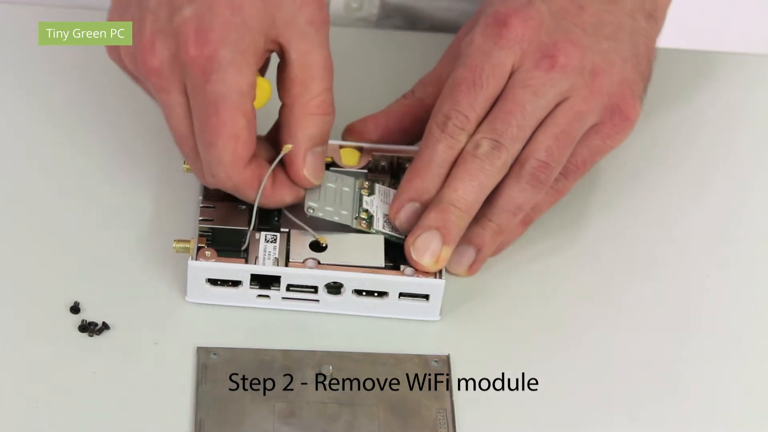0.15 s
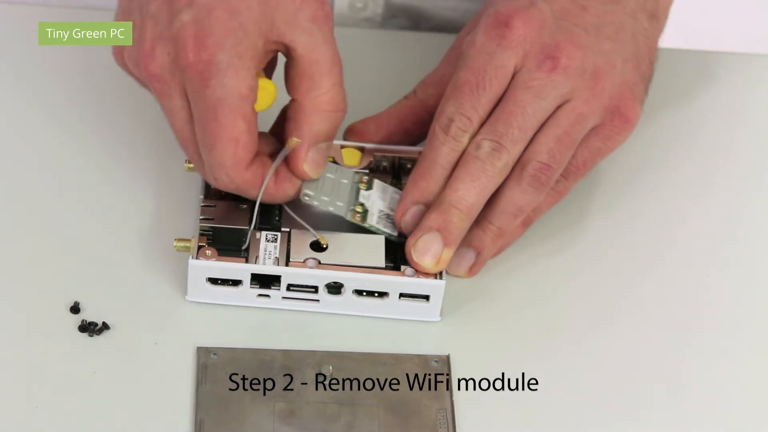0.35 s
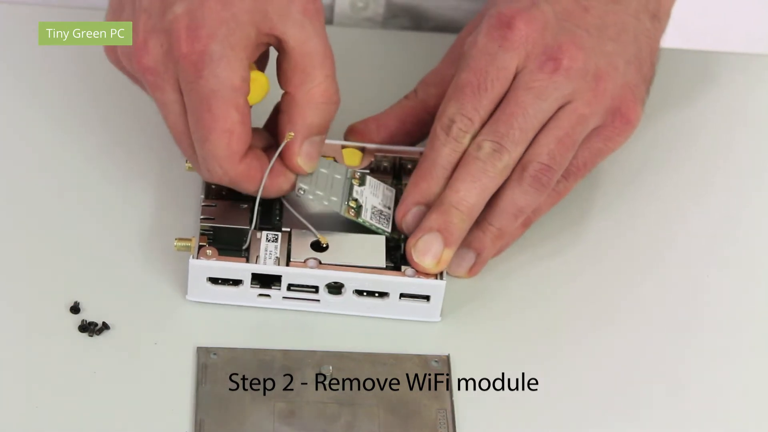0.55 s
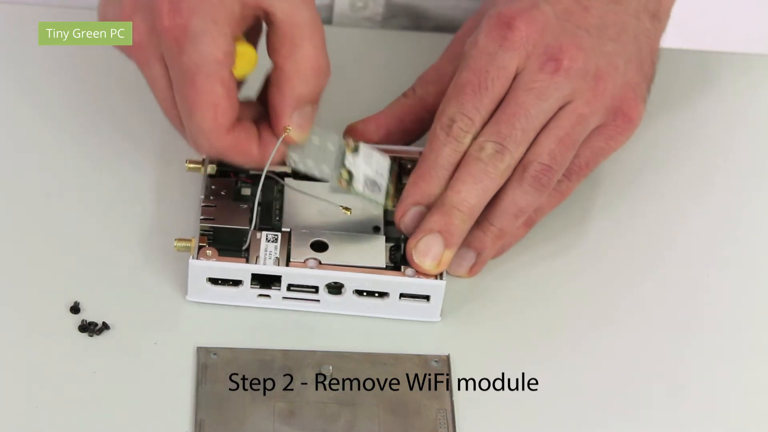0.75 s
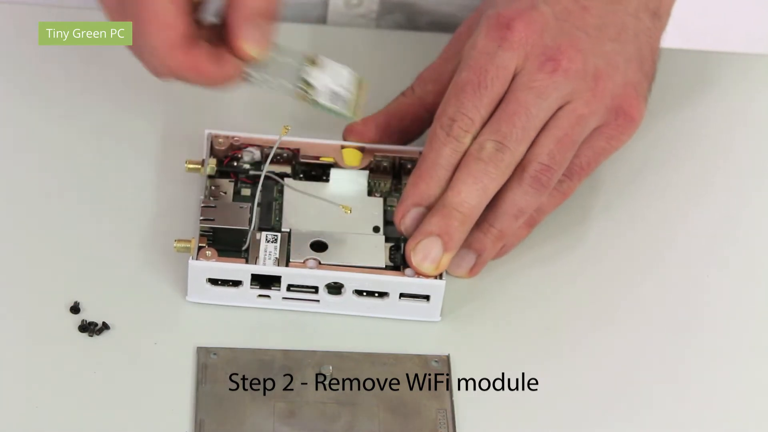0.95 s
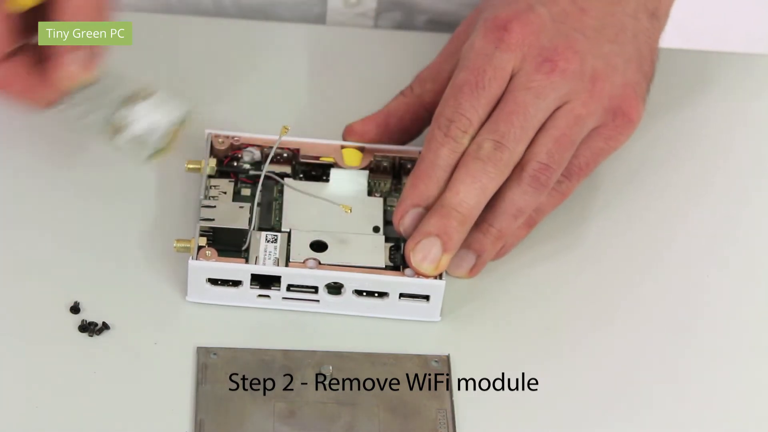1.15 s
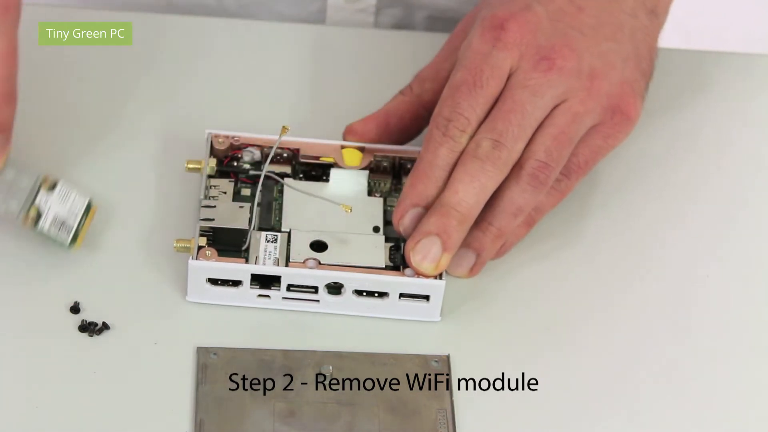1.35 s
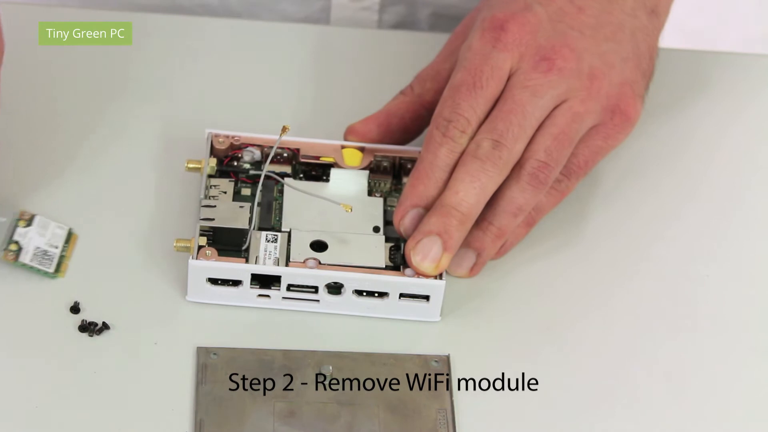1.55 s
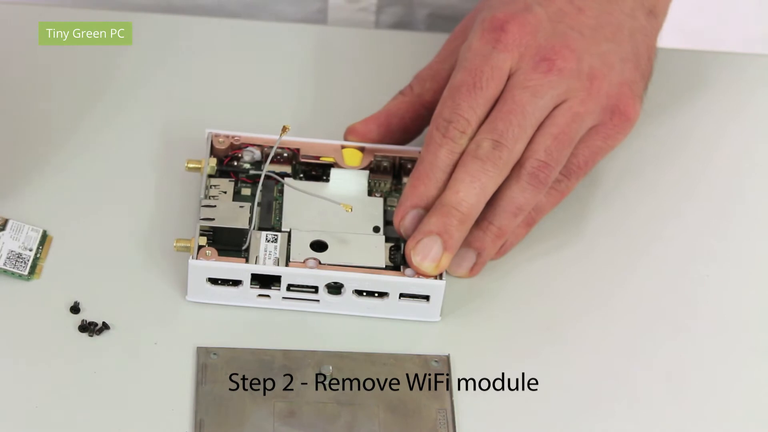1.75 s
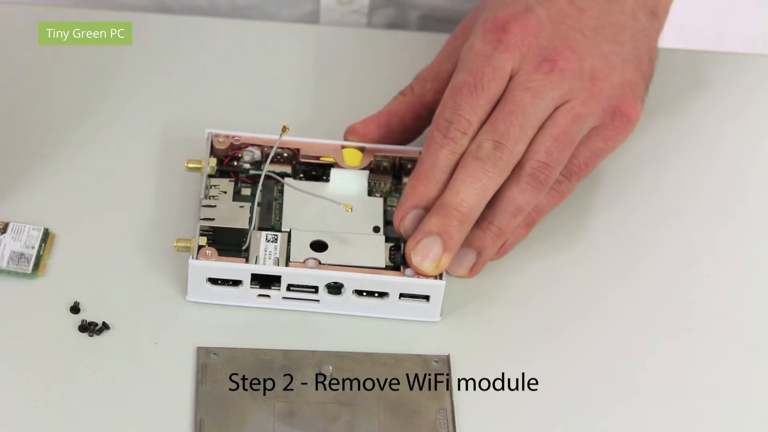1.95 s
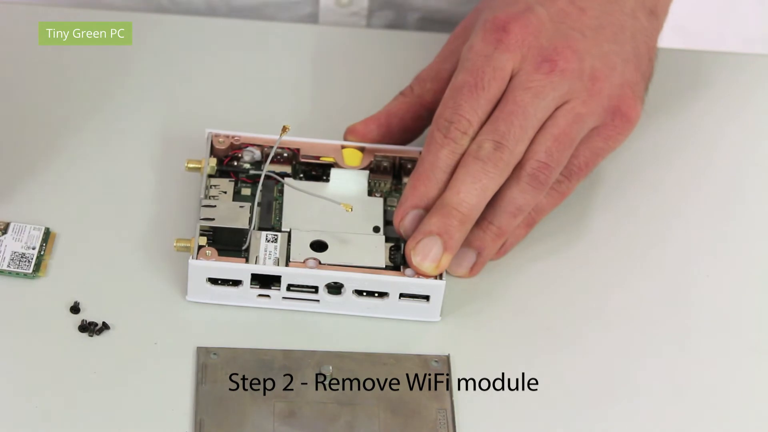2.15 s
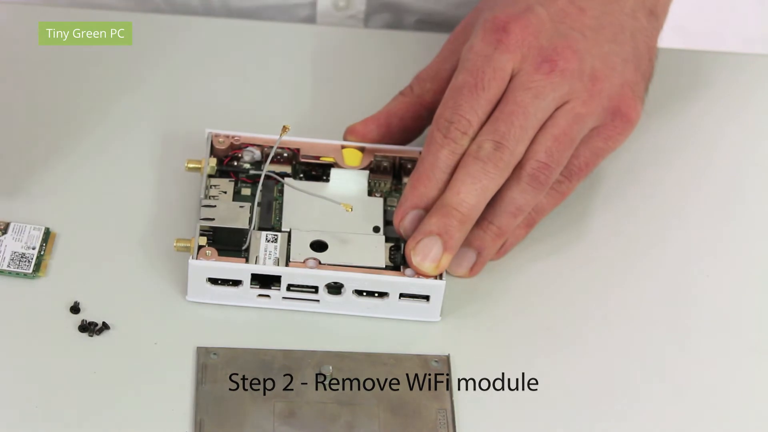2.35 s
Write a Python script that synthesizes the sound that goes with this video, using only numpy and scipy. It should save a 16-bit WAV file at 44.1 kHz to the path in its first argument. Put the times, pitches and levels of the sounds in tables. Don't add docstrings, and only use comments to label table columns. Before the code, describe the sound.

A small steel screwdriver clatters on a desk at about 1.9 seconds, by far the loudest event: fast sharp bounces, a short skid and high metallic ring, then thin rocking ticks until 2.25. Earlier, a circuit card gives faint clicks and scrapes from 0.1 to 0.4, a crisp snap at 0.6, then taps and hollow rubs from 1.43 to 1.9. Close microphone, quiet room, low hum and hiss.

```python
import sys
import numpy as np
from scipy import signal
from scipy.fft import rfft, irfft
from scipy.io import wavfile
from scipy.ndimage import uniform_filter1d

SR = 44100
rng = np.random.default_rng(int(sys.argv[2]) if len(sys.argv) > 2 else 0)


def bounce(signal):
    frames = np.transpose(np.atleast_2d(signal))
    limited = np.clip(frames, -1, 1)
    pcm = np.round(limited * 32767).astype(np.int16)
    wavfile.write(sys.argv[1], SR, pcm)


def magnitude_from_level(level_db):
    exponent = np.asarray(level_db, float) / 20
    return 10 ** exponent


N = 110250

# (time [s], crack [dB], desk knock [dB], middle modes [dB], high modes [dB])
BOUNCES = [(1.8945, -33, -52, -41, -52), (1.9025, -26, -61, -48, -37), (1.9066, -9.5, -43, -45, -42),
           (1.9095, -22, -22.5, -32, -32), (1.9125, -29, -20.5, -38, -43), (1.9187, -5.5, -24, -19, -13.5),
           (1.9278, -23, -63, -22, -26), (1.9344, -41, -46, -39, -45), (1.9495, -2, -22.5, -23, -22.5),
           (1.9525, -14, -28, -26, -28.5), (1.96, -22, -25, -35, -35), (1.9739, -18, -51, -49, -20),
           (1.9765, -25, -42, -23, -33), (1.9864, -32, -47, -29, -44), (1.9964, -22, -27, -54, -31),
           (2.0014, -47, -39, -49, -32), (2.0184, -40, -36, -58, -29), (2.0248, -13, -47, -23, -26),
           (2.0374, -28, -37, -30, -29), (2.0424, -29, -36, -39, -32), (2.0554, -24, -34, -43, -34),
           (2.0634, -30, -50, -34.5, -39), (2.1475, -58, -56, -53, -53), (2.2318, -30, -56, -45.5, -56),
           (2.243, -46, -62, -54, -64)]
# (crack [dB], desk knock [dB], middle modes [dB], high modes [dB])
BOUNCE_TRIMS = (-8.5, 0.5, 5, 5)
# (frequency [Hz], width [Hz], level [dB])
DESK = [(556, 170, -16.5), (1330, 210, -6), (1660, 200, -3), (1957, 170, 0), (2283, 180, 1),
        (2736, 316, 5.5), (3590, 220, -8.5), (4220, 240, 1.5)]
# (frequency [Hz], width [Hz], level [dB])
TOOL_MID = [(5820, 240, -1), (6870, 200, -1), (6460, 72, -7.5), (7223, 270, 8), (7410, 160, -1),
            (8980, 97, -10.5)]
# (frequency [Hz], width [Hz], level [dB])
TOOL_HIGH = [(9800, 540, -11), (10330, 150, -3), (11760, 220, -4.5), (13300, 330, -11.5), (12930, 81, 0)]


def screwdriver_bounces():
    return contacts(BOUNCES, BOUNCE_TRIMS, (DESK, TOOL_MID, TOOL_HIGH))


# (time [s], level [dB], mode frequency [Hz], mode width
# [Hz])
KNOCKS = [(.343, -42.5, 432, 202), (0.3433, -35, 2600, 250), (0.3821, -37.5, 2630, 200),
          (.382, -45.5, 816, 300), (0.591, -35.5, 5560, 700), (1.4352, -36, 3200, 300),
          (1.4365, -38.5, 2030, 150), (1.9094, -33.5, 340, 183), (1.9182, -12, 5730, 310),
          (1.9269, -19, 6000, 400), (1.9511, -22.5, 2730, 200), (1.9505, -34.5, 3630, 60),
          (2.039, -28, 6740, 300), (2.147, -38, 10640, 150), (2.1468, -44, 11800, 250),
          (1.9118, -23.5, 1930, 222), (1.92, -24, 10350, 170), (1.951, -28, 10300, 150),
          (1.96, -30, 10400, 200), (2.056, -31, 10370, 200), (2.232, -41, 10300, 170),
          (1.928, -17.5, 7330, 260), (1.977, -23, 7280, 220), (2.025, -19, 7220, 240)]


def single_mode_knocks():
    out = np.zeros(N)
    for start_s, db, hz, width in KNOCKS:
        ring = magnitude_from_level(db) * modal_ring([(hz, width, 0)])
        out[round(start_s * SR):][:len(ring)] += ring
    return out


# (start [s], rise [s], length [s], level [dB])
SHAFT_RINGS = [(1.897, .012, .022, -41), (1.9195, .001, .011, -24), (1.929, .002, .021, -33),
               (1.9495, .002, .028, -29.5), (1.9745, .006, .072, -26), (2.044, .004, .022, -52),
               (2.066, .008, .04, -47), (2.11, .01, .045, -55), (2.158, .008, .04, -58),
               (2.232, .001, .014, -51), (2.258, .008, .024, -66)]


def shaft_ring():
    mode_hz, fall_db_per_s, stop_s = 5336, 250, 0.006
    flutter_db, flutter_s = 1.5, 0.006
    t = np.arange(N) / SR
    level = np.zeros(N)
    for start_s, rise_s, length_s, db in SHAFT_RINGS:
        age = t - start_s
        gate = np.clip(age / rise_s, 0, 1) * np.clip((length_s - age) / stop_s, 0, 1)
        level += gate * magnitude_from_level(db - fall_db_per_s * np.clip(age - rise_s, 0, 1))
    flutter = evened(uniform_filter1d(rng.standard_normal(N), int(flutter_s * SR)))
    return level * magnitude_from_level(flutter_db * flutter) * np.sin(2 * np.pi * mode_hz * t)


# (time [s], level [dB])
SKID = [
    (1.878, -51),
    (1.888, -48.5),
    (1.911, -47),
    (1.955, -34),
    (2.0, -41),
    (2.06, -49),
    (2.12, -56.5),
    (2.229, -64),
]


def screwdriver_skid():
    time_s, db = np.transpose(SKID)
    pressure = magnitude_from_level(np.interp(np.arange(N) / SR, time_s, db, -150, -150))
    return stick_slip([
        (modal_ring(DESK), pressure),
        (modal_ring(TOOL_MID), pressure * magnitude_from_level(-1.5)),
        (modal_ring(TOOL_HIGH), pressure * magnitude_from_level(-16)),
        (crack(3100, 0.0003), pressure * magnitude_from_level(4.5)),
    ])


# (time [s], level [dB])
ROCKS = [
    (2.1376, -25),
    (2.1516, -26.5),
    (2.163, -27),
    (2.1747, -28),
    (2.1847, -37),
    (2.1968, -33),
    (2.2072, -30),
]
# (frequency [Hz], width [Hz], level [dB])
ROCK_MODES = [(6500, 570, 1), (7300, 500, -2), (14700, 900, -2)]


def screwdriver_rocking():
    out = np.zeros(N)
    for start_s, db in ROCKS:
        tick = crack(6000, 0.00012)
        ring = modal_ring(ROCK_MODES, 0.3)[:len(tick)]
        tick = magnitude_from_level(db) * (tick + magnitude_from_level(-10) * ring)
        out[round(start_s * SR):][:len(tick)] += tick
    return out


# (time [s], crack [dB], hollow low body [dB], middle modes [dB], high modes [dB])
CARD_TAPS = [(0.0995, -27.5, -57, -64, -63), (0.264, -34, -43, -55, -69), (0.3295, -40, -45, -46, -58),
             (0.3352, -40, -54, -46, -52), (0.3430, -30, -37, -37, -42), (0.3470, -38, -38, -57, -56),
             (0.3535, -42, -57, -50, -54), (0.3818, -28, -42, -50, -64), (0.3858, -34, -44, -46, -54),
             (0.3955, -36, -62, -52, -48), (0.5910, -14.5, -48, -50, -37), (0.6005, -33, -67, -56, -58),
             (0.6025, -38, -67, -51, -45), (0.6124, -44, -72, -70, -59), (1.4329, -23, -35, -39.5, -42.5),
             (1.4472, -36, -41.5, -45, -50), (1.4506, -42, -58, -45.5, -40.5), (1.4618, -34, -57, -48, -60),
             (1.5901, -25, -37.5, -39, -42), (1.6004, -31, -43, -45, -49), (1.6235, -29, -60, -56, -45),
             (1.6798, -29, -47, -43, -56), (1.776, -34, -62, -62, -60)]
# (crack [dB], low body [dB], middle modes [dB], high modes [dB])
TAP_TRIMS = (-9, 2.5, 6.5, 9.5)
# (frequency [Hz], width [Hz], level [dB])
CARD_LOW = [(1670, 260, -5), (2160, 360, -1.5), (2600, 610, 1.5), (3400, 540, -4), (3810, 520, -2)]
# (frequency [Hz], width [Hz], level [dB])
CARD_MID = [(4940, 770, -1), (6000, 300, -21), (7200, 126, -6)]
# (frequency [Hz], width [Hz], level [dB])
CARD_HIGH = [(9450, 220, -13), (9960, 700, 9), (12160, 310, -15), (12950, 310, -1), (14700, 300, -1)]


def card_taps():
    return contacts(CARD_TAPS, TAP_TRIMS, (CARD_LOW, CARD_MID, CARD_HIGH))


# (start [s], rise [s], length [s], edge pressure [dB], flat contact [dB], air gap pitch [Hz])
SLIDES = [
    (0.313, 0.022, 0.051, -48, -58, 2010),
    (0.359, .015, 0.053, -51.5, -74, 2000),
    (0.587, .004, 0.016, -48, -80, 2000),
    (1.495, 0.044, 0.095, -50, -51, 1970),
    (1.575, 0.0097, 0.099, -49, -47, 2060),
    (1.647, 0.034, 0.071, -45, -43.5, 2096),
    (1.721, 0.0035, 0.05, -67, -62, 2080),
    (1.74, 0.024, 0.12, -80, -61.5, 2080),
    (1.794, 0.011, 0.048, -52.5, -70, 2050),
    (1.857, 0.013, 0.033, -45.5, -51, 1970),
]
# (ratio to stroke pitch, width [Hz], level [dB])
AIR_GAP = [(1, 85, 0), (1.07, 70, -1)]
# (frequency [Hz], width [Hz], level [dB])
RUB_LOW = [(2940, 74, -7), (3640, 200, -14)]
# (frequency [Hz], width [Hz], level [dB])
RUB_MID = [(4400, 500, -4), (4980, 400, -5), (5980, 220, -5), (7320, 150, 3)]
# (frequency [Hz], width [Hz], level [dB])
RUB_HIGH = [(9500, 140, 0), (10200, 170, 1), (11600, 300, -9), (12950, 150, 0), (14700, 300, -9)]


def card_slides():
    release_s = 0.029
    t = np.arange(N) / SR
    edge, flat, gaps = np.zeros(N), np.zeros(N), []
    for start_s, rise_s, length_s, edge_db, flat_db, gap_hz in SLIDES:
        attack = np.clip((t - start_s) / rise_s, 0, 1)
        gate = attack * np.clip((start_s + length_s - t) / release_s, 0, 1)
        edge += magnitude_from_level(edge_db) * gate
        flat += magnitude_from_level(flat_db) * gate
        gap_modes = [(gap_hz * ratio, width, db) for ratio, width, db in AIR_GAP]
        gaps.append((modal_ring(gap_modes), magnitude_from_level(flat_db) * gate))
    scrape = stick_slip([
        (modal_ring(RUB_MID), edge * magnitude_from_level(-2.5)),
        (modal_ring(RUB_HIGH), edge * magnitude_from_level(-5)),
        (crack(3100, 0.00029), edge),
    ])
    return scrape + stick_slip(gaps + [(modal_ring(RUB_LOW), flat * magnitude_from_level(-13.5))])


def contacts(table, trims_db, mode_groups):
    out = np.zeros(N + SR)
    for start_s, crack_db, *ring_dbs in table:
        at = round(start_s * SR)
        tick = magnitude_from_level(crack_db + trims_db[0]) * crack(3100, 0.0011)
        out[at:at + len(tick)] += tick
        for db, trim_db, modes in zip(ring_dbs, trims_db[1:], mode_groups):
            ring = modal_ring(modes, 0.82)
            out[at:at + len(ring)] += magnitude_from_level(db + trim_db) * ring
    return out[:N]


def stick_slip(parts):
    slips_per_s, spread_db, clump_db, clump_s = 5000, 3.0, 3, 0.005
    clump = evened(uniform_filter1d(rng.standard_normal(N), int(clump_s * SR) + 1))
    happens = rng.random(N) < slips_per_s / SR
    strength = magnitude_from_level(spread_db * np.minimum(rng.exponential(1, N), 3))
    sign = rng.choice([-1., 1.], N)
    slips = evened(happens * strength * sign * magnitude_from_level(clump_db * clump))
    return sum(signal.oaconvolve(slips * pressure, h / np.linalg.norm(h))[:N] for h, pressure in parts)


def modal_ring(modes, spread=0):
    contact_s = 0.00045
    t = np.arange(SR // 10) / SR
    ring = np.zeros(len(t))
    for hz, width, db in modes:
        strength = magnitude_from_level(db) * rng.uniform(1 - spread, 1 + spread)
        decay = np.exp(-np.pi * width * t)
        ring += strength * decay * np.sin(2 * np.pi * (hz * t + rng.random()))
    ring *= 1 - np.exp(-t / contact_s)
    return ring / abs(ring).max()


def crack(low_hz, decay_s):
    t = np.arange(SR // 50) / SR
    high_pass = signal.butter(2, low_hz, "high", fs=SR, output="sos")
    burst = signal.sosfilt(high_pass, rng.standard_normal(len(t))) * np.exp(-t / decay_s)
    return burst / abs(burst).max()


def evened(x):
    return x / np.sqrt(np.mean(x ** 2) + 1e-20)


def read(points, hz):
    f, value = np.transpose(points)
    return np.interp(np.log(hz + 1), np.log(f + 1), value)


# (frequency [Hz], time to fall 60 dB [s])
ROOM_DECAY = [(300, 0.41), (1500, 0.65), (4000, 0.19), (9000, 0.17), (15000, 0.18)]
# (frequency [Hz], level [dB])
ROOM_TONE = [(300, 9), (1600, -5.5), (4000, -5.5), (7000, -4.5), (15000, -11)]
# (delay [s], level [dB])
ECHOES = [(.0016, -15), (.0043, -16)]


def room(x):
    taps = np.zeros(SR // 2)
    at = np.arange(300, len(taps) - 20, 20)
    taps[at + rng.integers(0, 20, len(at))] = rng.choice([-1., 1.], len(at))
    hz, t, bands = signal.stft(taps, SR, nperseg=256)
    decay = magnitude_from_level(-60 * t / read(ROOM_DECAY, hz)[:, None])
    tail = signal.istft(bands * decay, SR, nperseg=256)[1]
    tail = magnitude_from_level(-5) * coloured(tail / np.linalg.norm(tail), ROOM_TONE)
    for k, (delay_s, db) in enumerate(ECHOES):
        tail[round(delay_s * SR)] += (-1) ** k * magnitude_from_level(db)
    return signal.fftconvolve(x, tail)[:N]


def coloured(x, tone):
    hz = np.fft.rfftfreq(len(x), 1 / SR)
    return irfft(rfft(x) * magnitude_from_level(read(tone, hz)), len(x))


# (frequency [Hz], level [dB])
FLOOR = [(30, -51), (97, -17.5), (150, 0), (450, -7.5), (800, -12.5), (2500, -22.5), (6000, -27),
         (16000, -29.5)]


def room_floor():
    hum_hz, hum_width_hz = 141.5, 40
    hz = np.fft.rfftfreq(N, 1 / SR)
    wash = evened(coloured(rng.standard_normal(N), FLOOR))
    resonance = 1 / (1 + ((hz - hum_hz) / (hum_width_hz / 2)) ** 2)
    hum = evened(irfft(rfft(rng.standard_normal(N)) * resonance, N))
    return magnitude_from_level(-50.5) * wash + magnitude_from_level(-59) * hum


# (frequency [Hz], level [dB])
AIR = [(60, -28), (130, -2), (250, 0), (900, 7), (1300, 3), (13500, -2), (15500, -12)]


def scene():
    near = card_taps() + card_slides()
    near += screwdriver_bounces() + screwdriver_rocking() + screwdriver_skid() + single_mode_knocks()
    near = coloured(near + room(near), AIR)
    return (near + shaft_ring() + room_floor())[None]


def low_pass(x):
    return signal.sosfilt(signal.butter(12, 16830, fs=SR, output="sos"), x)


def record(dry):
    shelf = np.where(np.fft.rfftfreq(N, 1 / SR) > 15900, magnitude_from_level(-30), 1)
    mix = irfft(rfft(dry) * shelf, N)
    return low_pass(mix)


dry = scene()
out = record(dry)
bounce(out)
```